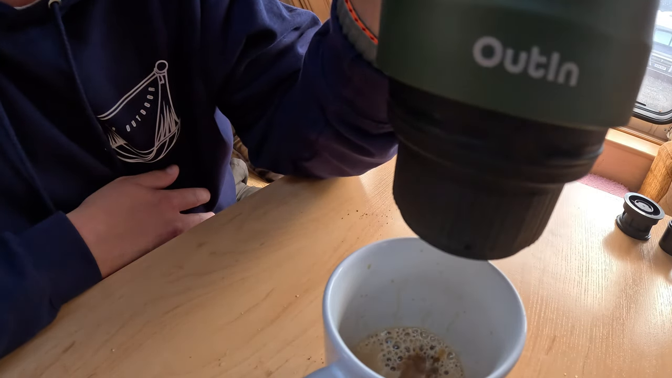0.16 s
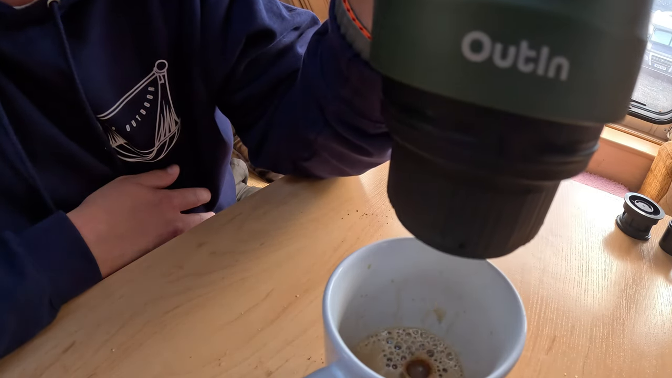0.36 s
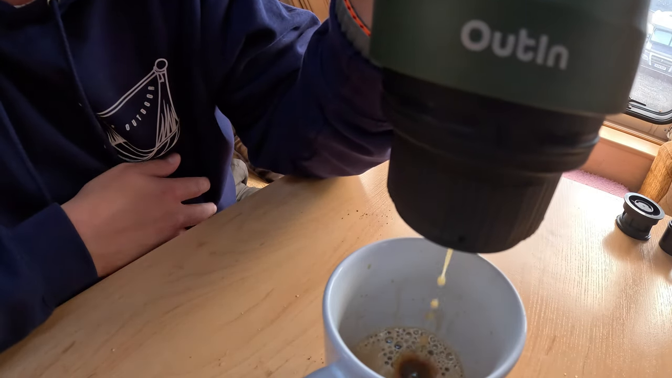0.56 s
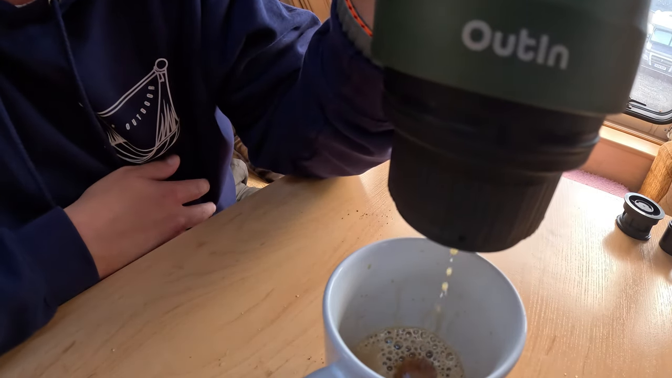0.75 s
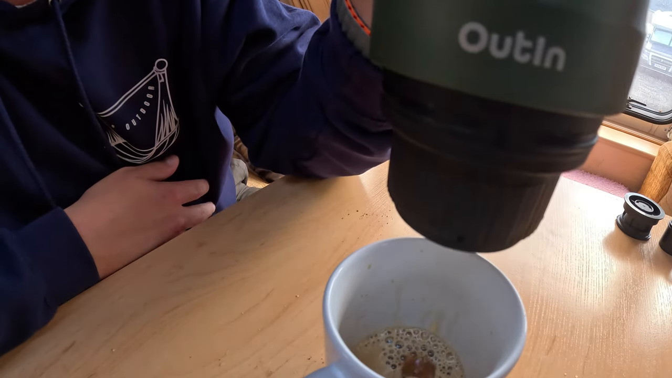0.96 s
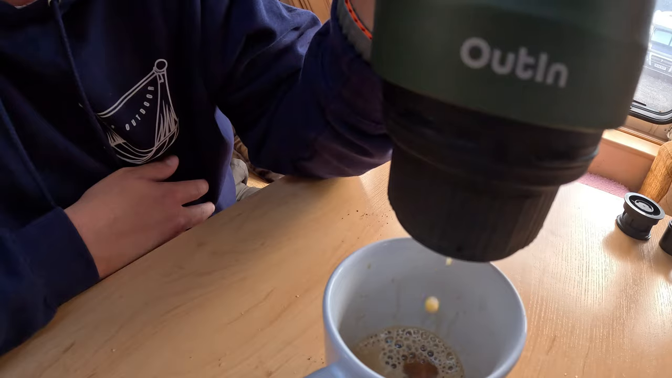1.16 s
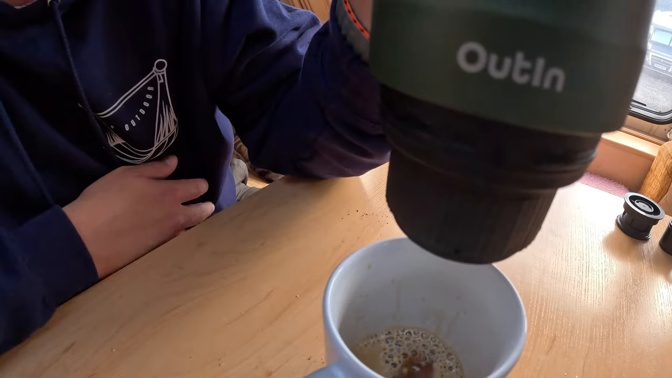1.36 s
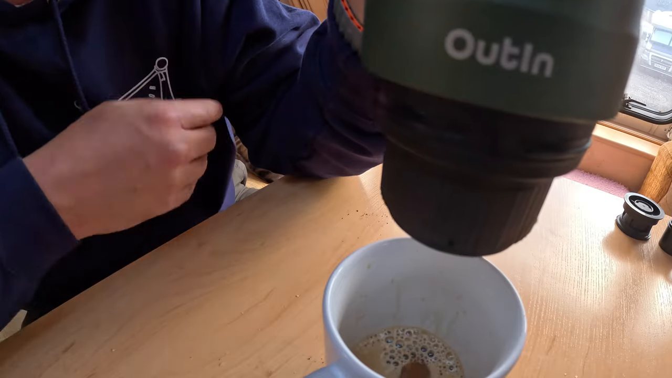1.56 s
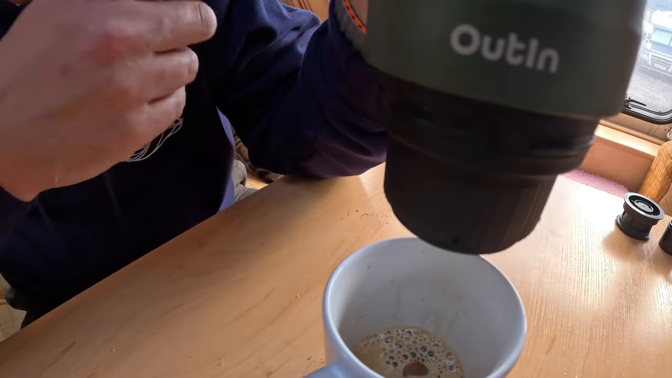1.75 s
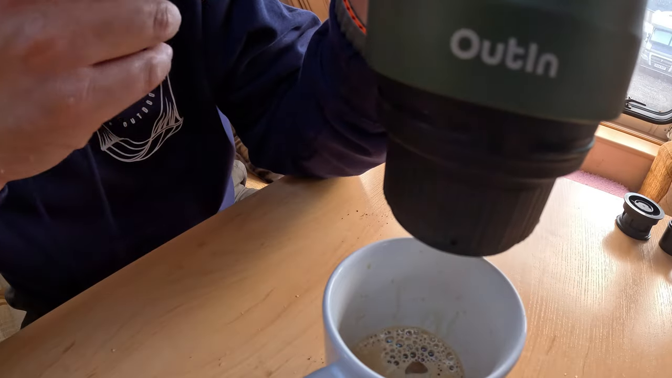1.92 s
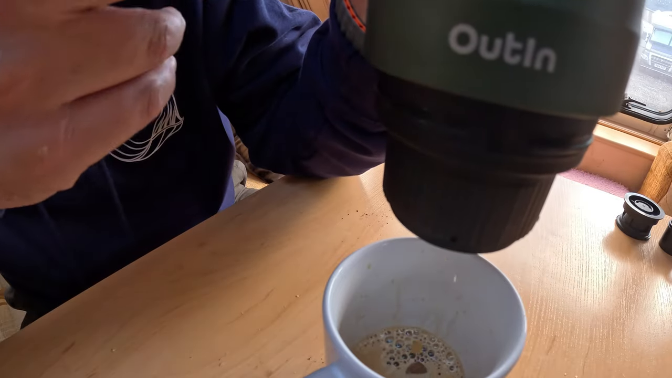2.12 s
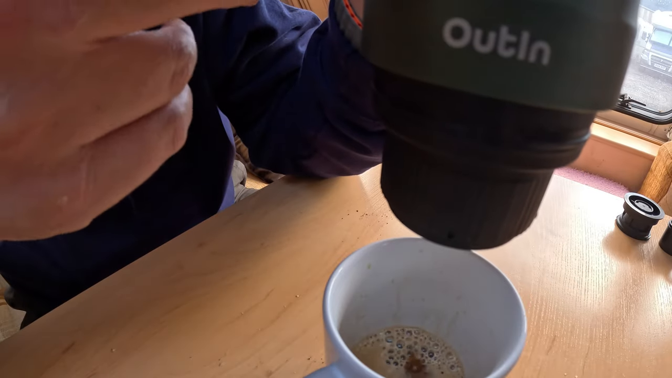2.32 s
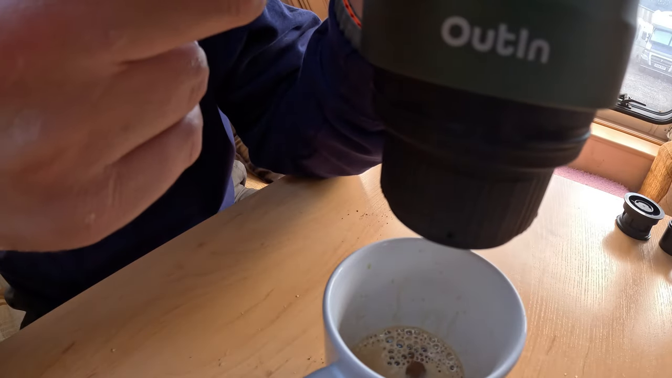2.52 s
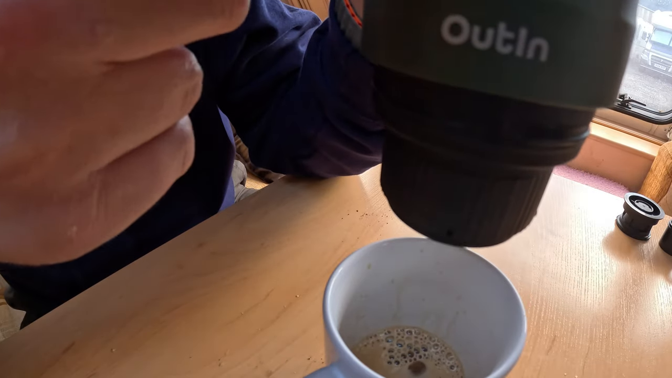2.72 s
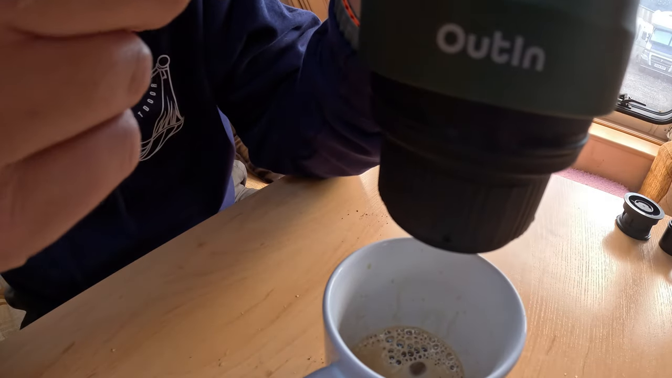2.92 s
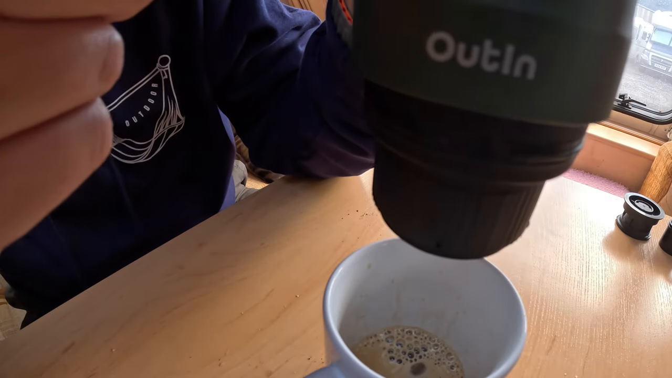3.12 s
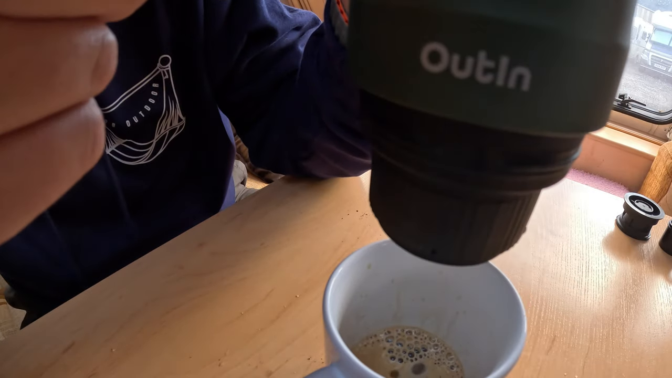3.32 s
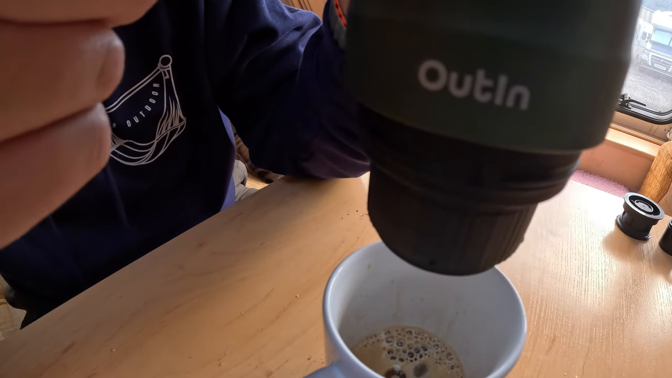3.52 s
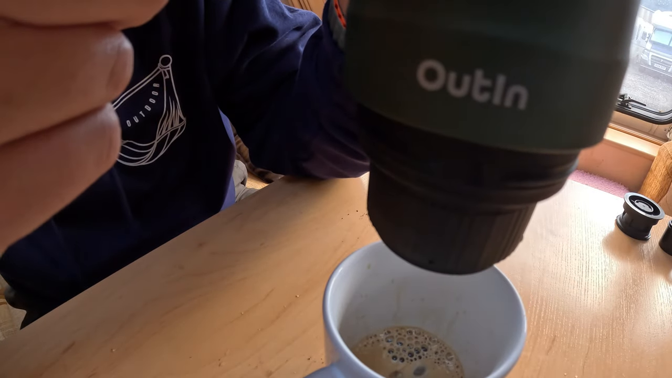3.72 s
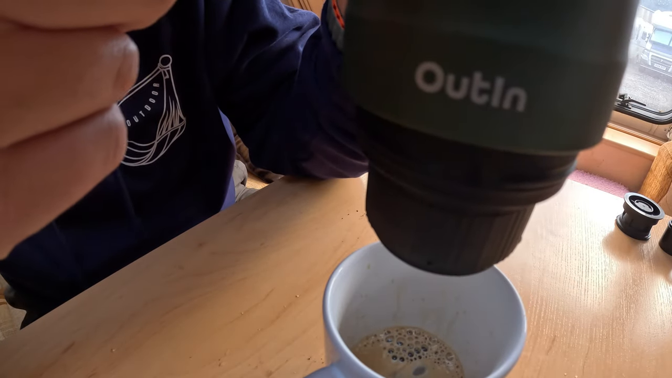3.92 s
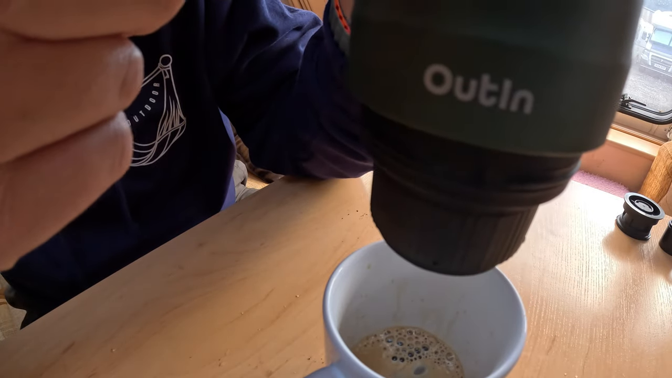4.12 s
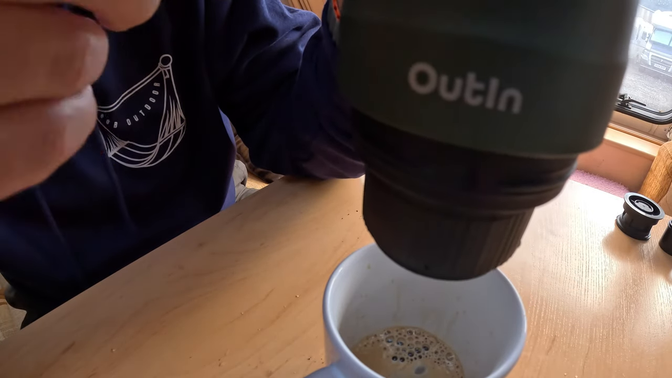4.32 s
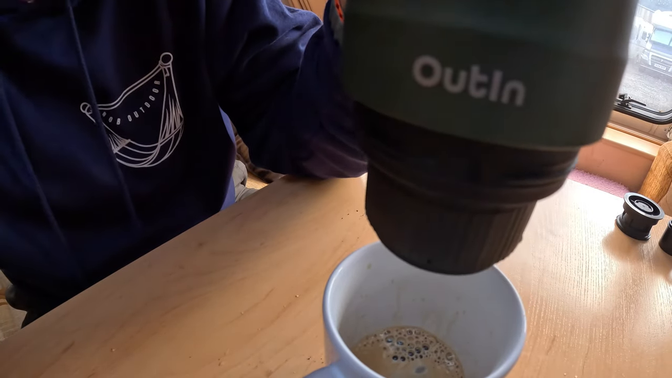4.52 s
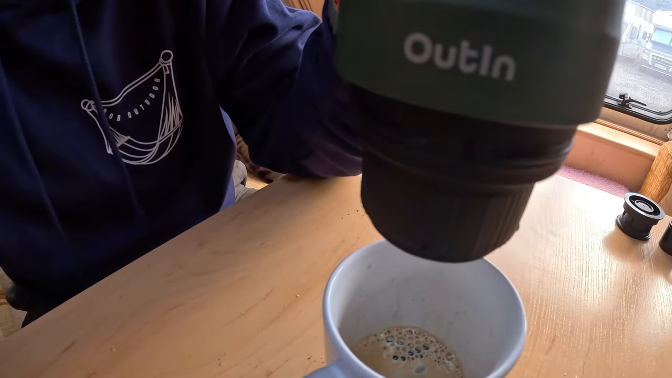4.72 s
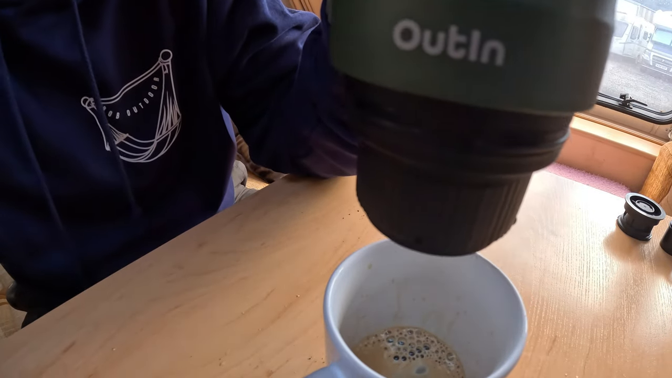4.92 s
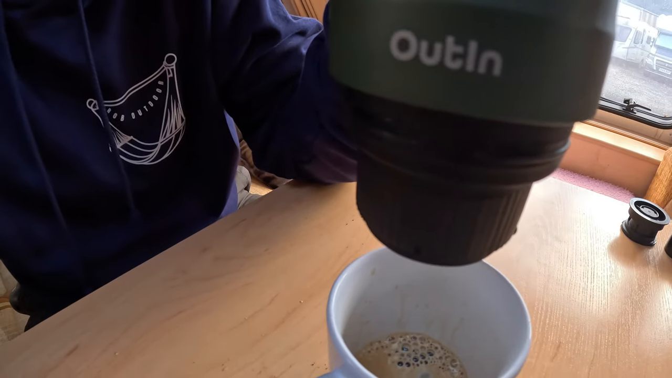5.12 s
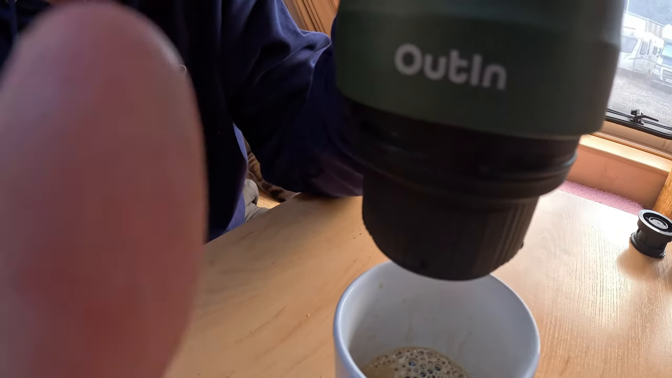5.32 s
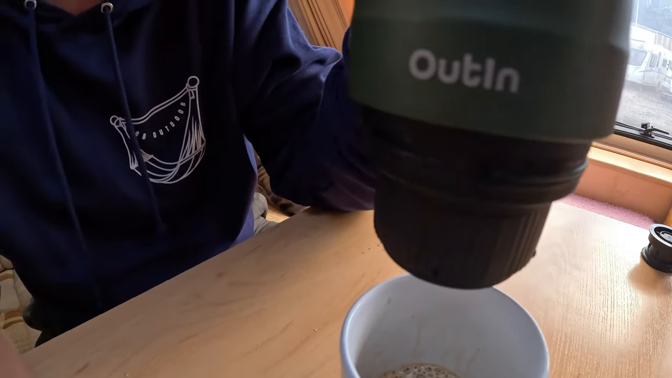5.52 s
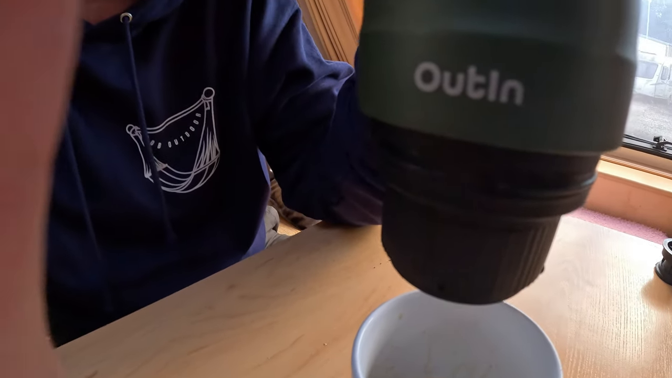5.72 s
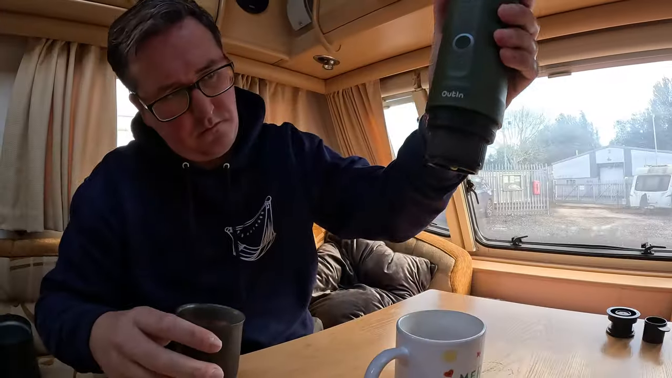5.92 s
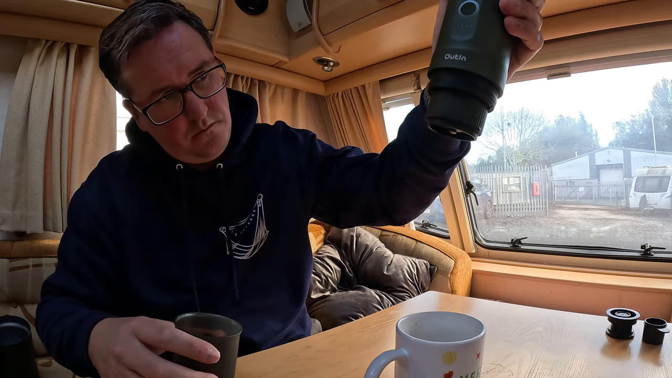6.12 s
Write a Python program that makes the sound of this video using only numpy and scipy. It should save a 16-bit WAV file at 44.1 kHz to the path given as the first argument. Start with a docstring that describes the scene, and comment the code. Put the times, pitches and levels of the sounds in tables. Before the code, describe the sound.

A hard, nasal motor buzz fills the first four and a half seconds, dry and near in a tight interior. Its pitch sags twice early, with loose rattling, and air squeals faintly through the wet outlet. The tone becomes steadier as the water runs out, with a couple of small spitting clicks. Power stops; a quick run of fading knocks follows, then faint room tone, brushing cloth and soft knocks of a cup on a table.

```python
"""A hard electric buzz close to the microphone, with sharp ticks: a hand-held espresso maker pumps its last water
through the coffee, over a table in a small camper. Each turn of the piston pump is a set of thumps, lined-up harmonics
of the crank, and valve ticks, impulses through resonances; it rattles when it labours, over filtered gear noise.
Air whistles through the wet spout in gliding partials, and the spout spits in damped rings.
The motor cuts out and knocks to a halt; a sleeve rustles in shaped noise and a cup is picked up with dull bumps."""
import sys
import numpy as np
from scipy import signal
from scipy.fft import rfft, irfft
from scipy.io import wavfile
from scipy.ndimage import uniform_filter1d

SR = 44100
rng = np.random.default_rng(int(sys.argv[2]) if len(sys.argv) > 2 else 0)


def master(y):
    """Save y as 16-bit WAV."""
    cut = np.clip(np.atleast_2d(y).T, -1, 1)
    pcm = np.round(cut * 32767)  # scale
    wavfile.write(sys.argv[1], SR, pcm.astype(np.int16))


N = 271656
TIME = np.arange(N) / SR

# buzz while water is pushed, while the chamber drains, once it is dry: [multiple of the speed, relative level/dB]
WET_ORDERS = [(1, -45.5), (2, -23), (3, -11.5), (4, -14.5), (5, -30.5), (6, -21.5), (7, 0), (8, -10.5),
              (9, -1), (10, -7.5), (11, -1), (12, -0.5), (13, -14), (14, -8), (15, -12), (16, -12),
              (17, -40), (18, -4.5), (19, -5.5), (20, -4), (21, -20.5), (22, -10), (23, -11), (24, -19)]
DRAINING_ORDERS = [(1, -41.5), (2, -24.5), (3, -9), (4, -14), (5, -25), (6, -25.5), (7, -1.5), (8, -2.5),
                   (9, -2), (10, 1), (11, -2), (12, 1), (13, -12), (14, -15.5), (15, -5.5), (16, -7.5),
                   (17, -4.5), (18, -20), (19, -10), (20, -16), (21, -9.5), (22, -12.5), (23, -26),
                   (24, -18)]
DRY_ORDERS = [(1, -41), (2, -23), (3, -7.5), (4, -14.5), (5, -23), (6, -13.5), (7, -0.5), (8, 1), (9, -5.5),
              (10, 7.5), (11, -3), (12, 1), (13, -15), (14, -14), (15, -5.5), (16, -8.5), (17, -2.5),
              (18, -5), (19, -12), (20, -23), (21, -12), (22, -9), (23, -6.5), (24, -30)]
# state of the chamber: [t/s, dryness: 0 full of water, 0.5 draining, 1 dry]
DRYNESS = [(0, 0.067), (.5, 0.13), (.72, 0.51), (1.8, 0.5), (2.05, 0.67), (2.8, 0.91), (4.5, 1)]
# loudness by state of the chamber: [dryness, buzz level/dB, valve tick level/dB,
# gear and water hiss level/dB without strain, rattle level/dB at full strain]
LOUDNESS = [(0, -20.5, -30.5, -33.5, -27.5), (.5, -22, -33.5, -33, -28), (1, -21, -31.5, -34, -26)]
# piston thumps within a turn: [share of the turn, level/dB, brightness/dB per multiple]
THUMPS = [(.13, -8, .45), (.53, -1, 0), (.63, 3, -.35), (.85, -6, 0)]
# valve and gear ticks within a turn: [share of the turn, level/dB, unstrained timing scatter/s]
TICKS = [(.97, 0, .000004), (.65, -13, .00002), (.17, -25, .00003), (.3, -22, .00003)]
# resonances of piston, valve seat, casing and gear train: [f/Hz, width/Hz, level/dB]
PISTON_MODES = [(694, 167, 30.5), (1166, 570, -14.5)]
VALVE_MODES = [(2200, 450, -3), (3000, 700, 0)]
CASING_MODES = [(550, 184, -9.5), (860, 93, -7), (1490, 900, -17), (3130, 230, -34)]
GEAR_MODES = [(2084, 290, 10), (3030, 1900, -3), (4260, 142, 6.5), (4800, 140, -18.5), (5757, 130, -2.5),
              (7770, 270, -11), (11010, 1500, -12), (12500, 900, -21)]
# ring of the body as it coasts: [f/Hz, width/Hz, level/dB]
COAST_MODES = [(841, 58, 0.5), (624, 180, -11.5), (228, 47, -15.5)]
# casing resonances that sing out under strain: [f/Hz, half-width/Hz, level gained/dB]
LABOUR_MODES = [(848, 43, 8), (1620, 220, 8)]
# speed of the unloaded pump, a little faster as the water runs out: [t/s, speed/turns per s]
FREE_SPEED = [(.55, 74.7), (.85, 75.55), (1.4, 75.7), (2.7, 75.45), (2.9, 75.8), (4.55, 76.05)]
# back pressure that the motor labours against: [t/s, speed lost/turns per s, build-up/s, release/s]
LOADS = [(.52, 6.4, .075, .04), (1.925, 2.3, .04, .04)]
# colour of the gear and water hiss: [f/Hz, level/dB per Hz]
HISS_COLOUR = [(90, -43), (200, -9), (400, -21), (560, -1.5), (850, 10.5), (1050, -4), (1400, 5.5),
               (1900, -3), (2900, 3.5), (4400, -6), (5800, -9.5), (8000, -19), (11200, -22.5), (13500, -41)]
# air through the spout: [t/s, f/Hz, level of the first partial/dB]
WHISTLE = [(0.755, 3833, -26), (0.773, 3610, -18), (0.835, 3350, -29), (0.929, 3212, -21),
           (1.021, 3148, -18), (1.201, 3218, -21), (1.243, 3280, -20.5), (1.283, 3340, -26),
           (1.293, 3700, -17), (1.3, 3640, -53)]
# spits and snaps at the spout, then cup and hand on the table:
# [t/s, level/dB, ring f/Hz, ring width/Hz, crack level/dB, rise/s]
SPITS = [(.6995, -9, 1850, 260, -4, .0002), (.778, -11, 1880, 100, -25, .0005),
         (4.0697, 0, 3300, 1200, -11, .00005), (4.0699, -7, 1700, 600, -20, .00005),
         (4.2378, -9, 2700, 600, -12, .0002), (4.2395, -9, 1850, 260, -14, .0003),
         (4.240, -15, 480, 120, -20, .001)]
BUMPS = [(5.607, -21, 726, 120, -30, .004), (5.613, -13, 614, 120, -34, 0.0011),
         (5.660, -15.5, 600, 109, -16, 0.0034), (5.683, -17, 1170, 224, -16, 0.00019),
         (5.6832, -27, 6150, 350, -23, .0004), (5.806, -13, 1050, 350, -31, 0.00099),
         (5.821, -35, 700, 300, -22, .001), (5.830, -14.5, 1060, 300, -32, 0.00085),
         (5.832, -14.5, 480, 202, -31, 0.0012), (5.835, -35, 119, 30, -18, 0.0026),
         (5.674, -28, 127, 30, -25, .003)]
# strokes of the sleeve: [t/s, level/dB, rise/s, fall/s]
STROKES = [(5.21, -59, 0.026, .04), (5.55, -48.5, 0.31, 0.24), (5.69, -45, 0.025, .015),
           (5.755, -47.5, 0.036, 0.014), (5.83, -46.5, 0.03, .02), (6.1, -65, 0.21, .3)]
# colours of the brushing cloth and of the cabin background: [f/Hz, level/dB per Hz]
SLEEVE_COLOUR = [(59, -81), (100, -66.5), (221, -3.5), (255, -16), (470, -20), (625, -17), (692, -32),
                 (1020, -16.5), (4420, -32), (13000, -67.5)]
CABIN_COLOUR = [(15, -55), (25, -32.5), (44, -15.5), (70, -16), (122, -17.5), (151, -5.5), (177, -3.5),
                (344, -2), (414, -10.5), (632, -2.5), (1230, -10), (1440, -10), (1730, -15.5),
                (14000, -52.5)]

GEAR_DB, CABIN_DB = -36.5, -50
# a load worth this many turns per s shakes the gears loose
LOOSE_SAG = 1.73
# the rotor's inertia offsets speed against load by this much
INERTIA_S = .02
# without power the pump runs out in this time, and its speed sinks at this rate
MOTOR_OFF_S, RUN_DOWN_S, SLOWING_PER_S = 4.573, 0.25, 3.6
# knocks of the coasting pump: first gap, growth of each gap, peak level, loss over the run-down
KNOCK_GAP_S, KNOCK_GAP_GROWTH = .0135, 1.12
KNOCK_DB, KNOCK_FADE_DB = -11.5, 37
# the whistle's octave, relative to the first partial, is strongest at the lowest pitch;
# it loses 1 dB this far above it, and more with the square of the rise
OCTAVE_DB, OCTAVE_REACH_HZ = -8, 110
# top of the microphone's range
CUTOFF_HZ = 13900


def pump(strain_hiss_db=3, tick_fade=1.5, rattle_fade=0.91, gear_fade=1.8):
    """The pump at close range: buzz stops with the power, the rest fades with momentum, and knocks follow."""
    speed, strain, momentum = motor()
    turns = np.cumsum(speed) / SR
    dryness, = in_time(DRYNESS)
    states, *levels = np.transpose(LOUDNESS)
    buzz_db, tick_db, hiss_db, rattle_db = (np.interp(dryness, states, db) for db in levels)
    powered = np.clip((MOTOR_OFF_S - TIME) / 0.011 + .5, 0, 1)

    tone = from_db(buzz_db) * buzz(turns, speed, strain, dryness) * powered
    ticks = from_db(tick_db) * valve(turns, strain) * momentum ** tick_fade
    loose = from_db(rattle_db) * strain * rattle(turns) * momentum ** rattle_fade
    gears = from_db(hiss_db + strain_hiss_db * strain) * hiss(turns)
    gears = gears + from_db(GEAR_DB) * grind(turns)
    return tone + ticks + loose + gears * momentum ** gear_fade + coasting()


def motor():
    """Speed, strain (0-1) and momentum (1 running, 0 at rest): load and loss of power both slow the motor."""
    sag = sum(lost * swell(s, rise_s, fall_s, roundness=1.15) for s, lost, rise_s, fall_s in LOADS)
    free, = in_time(FREE_SPEED)
    coasted_s = np.maximum(TIME - MOTOR_OFF_S, 0)
    kept = np.exp(-SLOWING_PER_S * coasted_s)
    speed = (free - sag) * kept
    load = np.interp(TIME + INERTIA_S, TIME, sag) + free * (1 - kept)
    strain = np.tanh((load / LOOSE_SAG) ** 2)
    momentum = np.clip(1 - coasted_s / RUN_DOWN_S, 0, 1)
    return speed, strain, momentum


def buzz(turns, speed, strain, dryness, wobble=0.0002, strain_wobble=0.0027, flutter_db=0.8):
    """Harmonics of the crank, lined up in phase into a few ringing piston thumps a turn."""
    # the wobbles are in turns
    crank = turns + (wobble + strain_wobble * strain) * drift(70)
    usual_hz = np.median(speed)
    out = 0
    for k, states in enumerate(zip(WET_ORDERS, DRAINING_ORDERS, DRY_ORDERS), 1):
        # thumps and piston resonances set only the phase of each harmonic
        push = sum(from_db(db + tilt * k) * np.exp(-2j * np.pi * k * share) for share, db, tilt in THUMPS)
        body = sum(from_db(db) / (1 + 2j * (k * usual_hz - hz) / width) for hz, width, db in PISTON_MODES)
        phase = np.angle(-push * body)
        level_db = np.interp(dryness, [0, .5, 1], [db for _, db in states]) + flutter_db * drift(6.9)
        singing_db = sum(db / (1 + ((k * speed - hz) / width) ** 2) for hz, width, db in LABOUR_MODES)
        out = out + from_db(level_db + strain * singing_db) * np.sin(2 * np.pi * k * crank + phase)
    # even out the running level
    return out / np.sqrt(uniform_filter1d(out ** 2, size=4096))


def valve(turns, strain, strain_scatter=6):
    """Sharp ticks ring the valve seat at fixed places in the turn; their timing loosens under strain."""
    train = 0
    for share, db, scatter_s in TICKS:
        at = once_a_turn(turns, share)
        late, size_db = rng.standard_normal((2, len(at)))
        late_s = late * scatter_s * (1 + strain_scatter * np.interp(at, TIME, strain))
        train = train + clicks(at + late_s, from_db(db + size_db))
    ticks = camper(resonate(train, VALVE_MODES), wet_db=-13)
    return rms_one(band(ticks, 1400, 3650))


def rattle(turns, uneven_db=3, scatter_s=.00016):
    """Gear play knocks the casing a few times a turn, never quite in time."""
    at = np.concatenate([once_a_turn(turns, share) for share, _, _ in TICKS])
    late, size = rng.standard_normal((2, len(at)))
    train = clicks(at + scatter_s * late, from_db(uneven_db * size))
    knocks = camper(resonate(train, CASING_MODES), wet_db=5.5)
    return rms_one(band(knocks, 196, 6000))


def hiss(turns, swell_db=3, swell_share=0.27, grain_db=2.0):
    """Sliding gears and squeezed water hiss in grains that swell once a turn."""
    turn_db = swell_db * np.cos(2 * np.pi * (turns - swell_share))
    return rms_one(noise(HISS_COLOUR) * from_db(turn_db + grain_db * drift(700)))


def grind(turns, swell_db=4, swell_share=0.32):
    """The same rough gear faces pass on every turn, so their rasp is a comb of fine lines."""
    faces = rng.standard_normal((2, 400))
    first, second = (np.interp(turns % 1, np.linspace(0, 1, len(face)), face) for face in faces)
    # the shaft wanders a little, so the line of contact shifts
    contact = first + .35 * drift(4) * second
    load = from_db(swell_db * np.cos(2 * np.pi * (turns - swell_share)))
    return rms_one(band(resonate(contact * load, GEAR_MODES), 1300, 14000))


def coasting(contact_s=0.0055, count=10):
    """Without power the piston bounces on the trapped pressure: slowing, fading knocks."""
    # sum of the growing gaps
    after_s = KNOCK_GAP_S * (KNOCK_GAP_GROWTH ** np.arange(count) - 1) / (KNOCK_GAP_GROWTH - 1)
    at = MOTOR_OFF_S + after_s
    sizes = from_db(-KNOCK_FADE_DB * (after_s / RUN_DOWN_S) ** 2)
    knocks = band(resonate(clicks(at, sizes), COAST_MODES), 110, 1130, order=3)
    # each push builds up over a few milliseconds
    last = at[np.clip(np.searchsorted(at, TIME) - 1, 0, None)]
    knocks = knocks * (1 - 0.51 * np.exp(-np.abs(TIME - last) / contact_s))
    return knocks * from_db(KNOCK_DB) / np.abs(knocks).max()


def whistle(third_db=-21, fourth_db=-33, fade_s=0.0033):
    """Air squeezes through a wet gap in the spout: a thin, unsteady tone with weak overtones."""
    hz, first_db = in_time(WHISTLE)
    octave_db = first_db + OCTAVE_DB - ((hz - hz.min()) / OCTAVE_REACH_HZ) ** 2
    # third and fourth partials are set relative to the octave
    partials_db = [first_db, octave_db, octave_db + third_db, octave_db + fourth_db]
    phase = 2 * np.pi * np.cumsum(hz * (1 + .0035 * drift(220))) / SR
    start_s, end_s = WHISTLE[0][0], WHISTLE[-1][0]
    blowing = np.clip(np.minimum(TIME - start_s, end_s - TIME) / fade_s, 0, 1)
    return np.sqrt(2) * blowing * sum(from_db(db) * np.sin(k * phase) for k, db in enumerate(partials_db, 1))


def spits():
    """Spits and snaps at the spout: short rings and cracks with hardly any thud."""
    return band(taps(SPITS, crack_s=0.00065, thud_db=-42, thud_hz=607), 310, 16000)


def bumps():
    """Cup and hand touch the table: dull rings over a low thud."""
    return taps(BUMPS, crack_s=0.0011, thud_db=-23, thud_hz=115)


def taps(rows, crack_s, thud_db, thud_hz):
    """Each tap is one damped ring, a short crack and a low thud; soft contacts rise slowly."""
    out = np.zeros(N)
    t = TIME[:4096]
    for s, db, hz, width, crack_db, rise_s in rows:
        ring = np.sin(2 * np.pi * hz * t) * np.exp(-np.pi * width * t)
        crack = band(rng.standard_normal(len(t)), 900, 7300) * np.exp(-t / crack_s)
        thud = rms_one(band(rng.standard_normal(len(t)), thud_hz / 2, thud_hz * 2)) * np.exp(-t / 0.021)
        tap = ring + from_db(crack_db) * crack + from_db(thud_db) * thud
        start = round(s * SR)
        out[start:start + len(t)] += from_db(db) * tap * (1 - np.exp(-t / rise_s))
    return out


def sleeve():
    """Cloth brushes along in strokes of coloured noise with a fine random flutter."""
    power = sum((from_db(db) * swell(s, rise_s, fall_s)) ** 2 for s, db, rise_s, fall_s in STROKES)
    return np.sqrt(power) * from_db(1.3 * drift(90)) * noise(SLEEVE_COLOUR)


def cabin():
    """The quiet cabin: steady coloured noise."""
    return from_db(CABIN_DB) * noise(CABIN_COLOUR)


def camper(x, wet_db=-12, t60=0.1):
    """Adds a short, dull tail from close walls and cushions: decaying band-limited noise."""
    t = TIME[:8192]
    tail = band(rng.standard_normal(len(t)), 150, 3300) * from_db(-60 * t / t60) * (t > .004)
    return x + from_db(wet_db) * signal.fftconvolve(x, tail / np.linalg.norm(tail))[:N]


def from_db(db):
    """Decibels to gain."""
    return 10 ** (np.asarray(db) / 20)


def rms_one(x):
    """Scale to unit rms."""
    return x / np.sqrt(np.mean(x ** 2) + 1e-20)


def in_time(rows):
    """Each column of a curve at every sample."""
    s, *columns = np.transpose(rows)
    return [np.interp(TIME, s, c) for c in columns]


def drift(rate):
    """Random curve of spread 1: straight lines between knots, rate knots a second."""
    knots = rng.standard_normal(4096)
    return np.interp(TIME * rate, np.arange(len(knots)), knots) / np.sqrt(2 / 3)


def swell(s, rise_s, fall_s, roundness=1.6):
    """A hump of height 1 that builds up to its moment and dies away."""
    return np.exp(-np.abs((TIME - s) / np.where(TIME < s, rise_s, fall_s)) ** roundness)


def noise(spectrum):
    """Noise of unit rms with the given colour, falling away below its lowest frequency."""
    hz, db = np.transpose(spectrum)
    bins = np.maximum(np.arange(N // 2 + 1) * SR / N, 1)
    colour = from_db(np.interp(np.log(bins), np.log(hz), db)) * np.minimum(bins / hz[0], 1)
    return rms_one(irfft(rfft(rng.standard_normal(N)) * colour, N))


def once_a_turn(turns, share):
    """The moments at which the crank passes a given share of its turn."""
    return np.interp(np.arange(400) + share, turns, TIME)


def clicks(times, sizes):
    """Impulses, each shared between its two nearest samples."""
    # a tiny floor instead of exact silence
    out = np.full(N, 1e-18)
    at = np.clip(np.asarray(times) * SR, 0, N - 2)
    np.add.at(out, at.astype(int), sizes * (1 - at % 1))
    np.add.at(out, at.astype(int) + 1, sizes * (at % 1))
    return out


def resonate(x, modes):
    """Parallel resonances of alternating sign."""
    out = 0
    for k, (hz, width, db) in enumerate(modes):
        r = np.exp(-np.pi * width / SR)
        poles = [1, -2 * r * np.cos(2 * np.pi * hz / SR), r * r]
        gain = (-1) ** k * from_db(db) * (1 - r * r) / 2
        out = out + gain * signal.lfilter([1, 0, -1], poles, x)
    return out


def band(x, low_hz, high_hz, order=2):
    """Causal band-pass."""
    return signal.sosfilt(signal.butter(order, [low_hz, high_hz], "band", fs=SR, output="sos"), x)


def scene():
    """Pump and spout, then handling, over the quiet cabin."""
    return (pump() + whistle() + camper(spits() + bumps()) + sleeve() + cabin())[None]


def record(dry, notch_hz=9050, notch_q=6):
    """The microphone has a narrow notch in the treble; the top is cut steeply."""
    coloured = signal.lfilter(*signal.iirnotch(notch_hz, notch_q, fs=SR), dry)
    return signal.sosfilt(signal.ellip(10, .1, 80, CUTOFF_HZ, fs=SR, output="sos"), coloured)


dry = scene()
out = record(dry)
master(out)
```